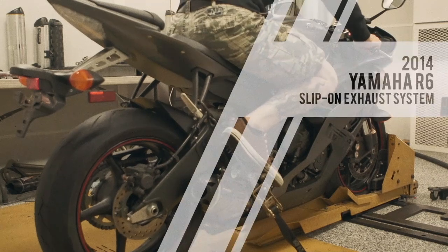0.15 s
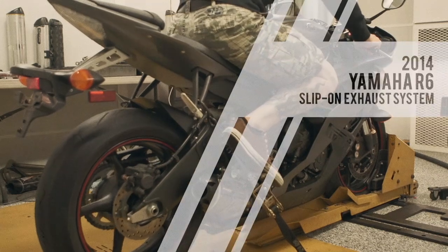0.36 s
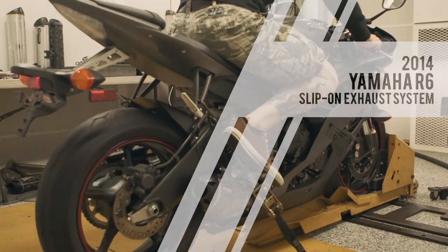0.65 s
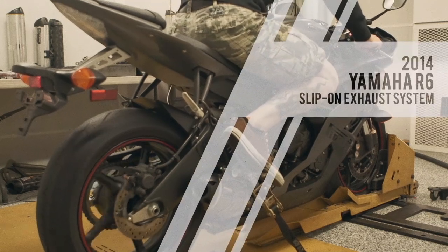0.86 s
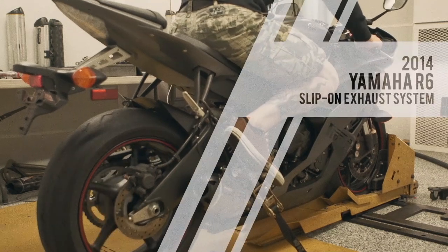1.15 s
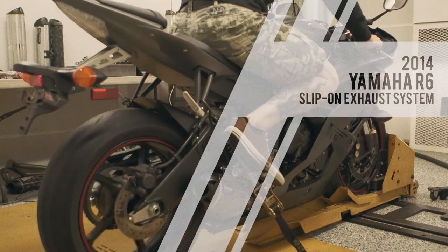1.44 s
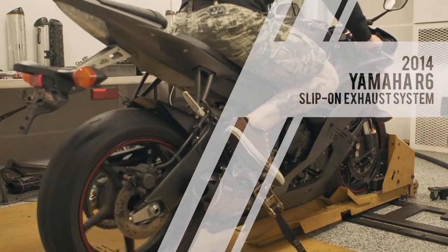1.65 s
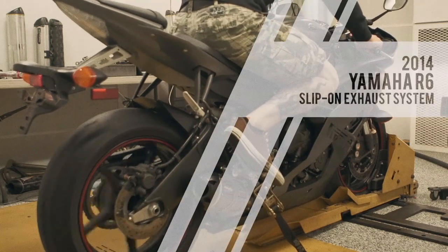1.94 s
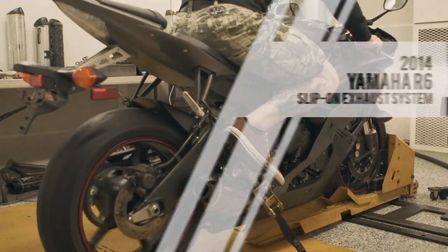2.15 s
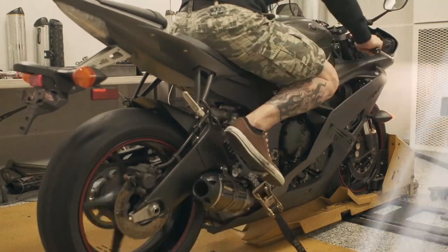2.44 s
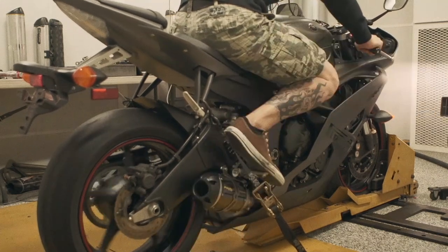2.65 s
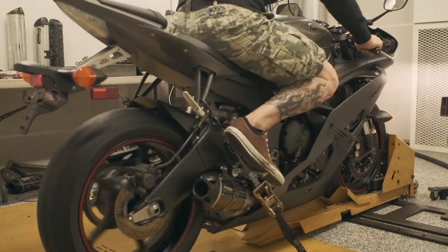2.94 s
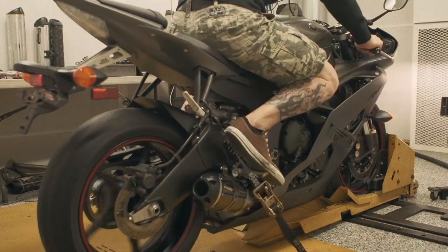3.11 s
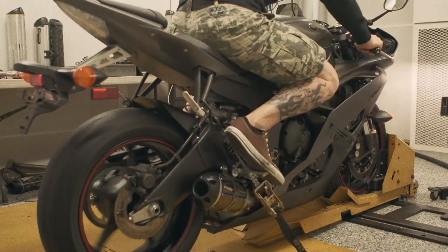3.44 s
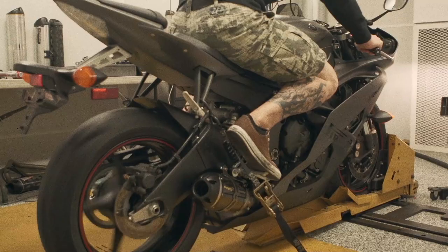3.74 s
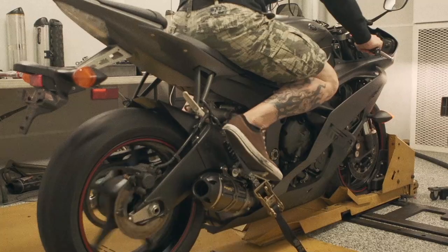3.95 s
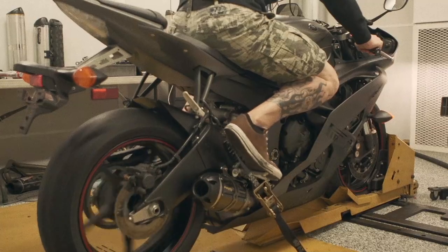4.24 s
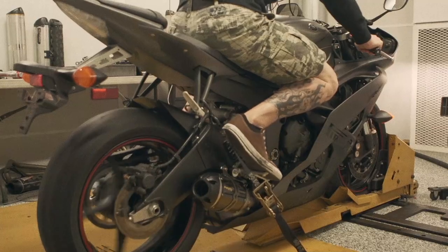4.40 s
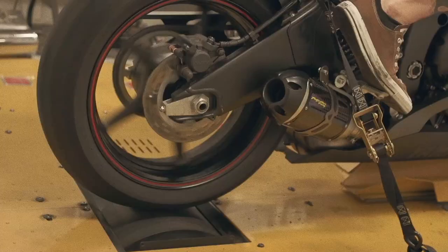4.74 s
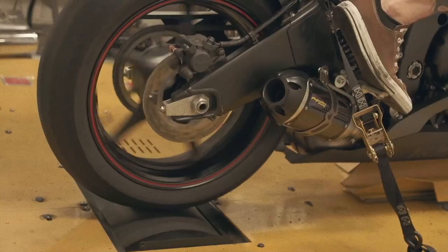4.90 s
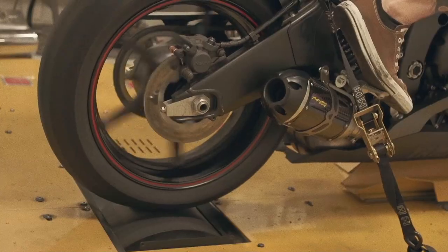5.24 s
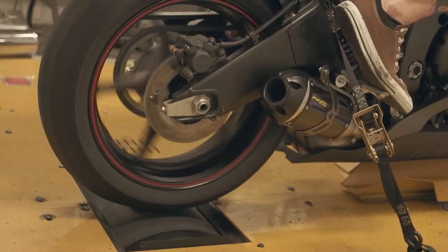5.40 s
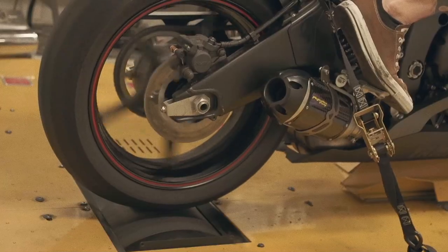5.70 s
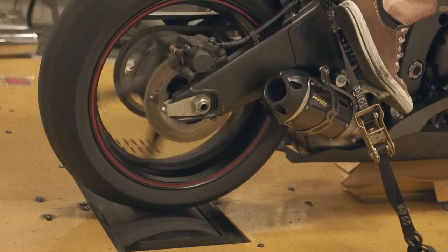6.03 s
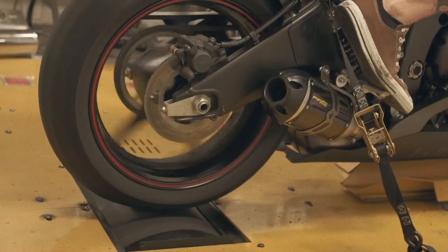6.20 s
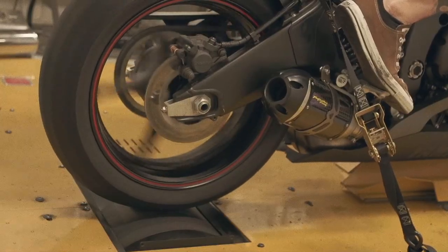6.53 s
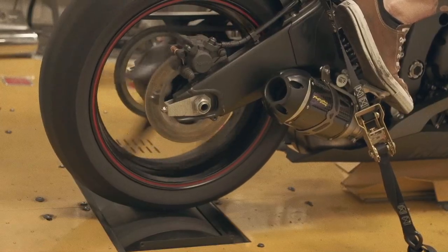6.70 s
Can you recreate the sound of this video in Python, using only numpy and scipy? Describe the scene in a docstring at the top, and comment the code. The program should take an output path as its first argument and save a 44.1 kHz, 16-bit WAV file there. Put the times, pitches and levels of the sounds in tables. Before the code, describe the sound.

A four-cylinder sport motorcycle on a roller dynamometer, heard close to the exhaust in a small reflective workshop, sitting right of centre and drifting slightly inward. From 0 to 0.8 s it idles with a deep, throbbing burble, stumbling briefly around 0.1 and 0.3 s. Revs rise quickly to a peak near 1.4 s, then sag with a full, loaded tone to a low, lumpy catch at about 2.7 s. From 2.8 s it digs in and climbs without a break until the cut at 6.9 s, roughly quadrupling its pitch from growl to hard raspy howl. Gas rush, valve clatter and hiss pulse with the firings; a panel buzzes near 3.7 s, short bright chain swishes flick past between 1 and 5.4 s, and gear whine swells around 5 s. Steady fan hum and low roller rumble lie underneath, while tyre fizz grows after 4 s.

```python
"""A four-cylinder sport motorcycle on a roller dynamometer in a small workshop, heard beside the exhaust.
It idles with brief stumbles, revs as the clutch is let in, sags, then pulls upward to the end.
Firing pulses are stacked orders of the firing rate, swept through fixed resonances of pipe and room.
Filtered noise makes the gas, clatter, hiss, tyre fizz, roller rumble and chain swishes; narrow noise bands
make panel buzz and gear whine. Cosines make the rasp and, with narrow noise bands, the fan hum."""
import sys
import numpy as np
from scipy import signal
from scipy.fft import rfft
from scipy.io import wavfile

SR = 44100
rng = np.random.default_rng(int(sys.argv[2]) if len(sys.argv) > 2 else 0)


def transcribe(signal):
    """Save signal, clipped to [-1, 1], as a 16-bit WAV file at the path in sys.argv[1]."""
    frames = np.atleast_2d(signal).T
    limited = np.clip(frames, -1, 1)
    pcm = np.round(limited * 32767).astype(np.int16)
    wavfile.write(sys.argv[1], SR, pcm)


N = 302526
TIME = np.arange(N) / SR  # seconds
MID_REVS_HZ = 100  # firings per second from which the speed laws count octaves

# Standing waves and cancellations between floor and walls, as peaks and dips.
# Each row: centre in Hz, width in Hz, height in dB at full strength.
ROOM = [(64.5, 13.4, -12), (91.6, 14.6, -9), (132.4, 4.8, -6), (155, 30, -4), (230.3, 21.4, -7),
        (267, 21.7, -11.5), (320.7, 12.7, -13.5), (333, 71, 5.5), (439, 41, -9), (484, 110, 4),
        (716, 18, 6.5), (1020, 30, 6.5), (1374, 84, 3.5)]


def amp(db):
    """Decibels to gain."""
    return 10 ** (np.asarray(db) / 20)


def evened(x):
    """Scales to an rms of one."""
    return x / np.sqrt(np.mean(x ** 2) + 1e-20)


def band_evened(x, lo_hz, hi_hz):
    """Scales so that one band has an rms of one."""
    hz = np.fft.rfftfreq(N, 1 / SR)
    in_band = (hz > lo_hz) & (hz < hi_hz)
    return x * N / np.sqrt(2 * np.sum(abs(rfft(x)[in_band]) ** 2))


def curves(rows):
    """Each column of a time table, joined by straight lines at every sample."""
    s, *columns = np.transpose(rows)
    return [np.interp(TIME, s, column) for column in columns]


def bell(x, centre, width):
    """A smooth hump of height one; the width spans its points at 1/e."""
    return np.exp(-(2 * (x - centre) / width) ** 2)


def swells(rows):
    """Gain of short events that rise and fall smoothly."""
    return sum(amp(db) * bell(TIME, s, length) for s, length, db in rows)


def octaves(rate):
    """Engine speed in octaves above mid revs."""
    return np.log2(rate / MID_REVS_HZ)


def colour(x, points, bells=()):
    """Causal minimum-phase filter from a broad spectrum plus narrow peaks and dips."""
    size = 32768
    hz = abs(np.fft.fftfreq(size, 1 / SR))
    point_hz, point_db = np.transpose(points)
    db = np.interp(np.log(hz + 1), np.log(point_hz + 1), point_db)
    for centre_hz, width, height_db in bells:
        db = db + height_db / (1 + (2 * (hz - centre_hz) / width) ** 2)
    # the Hilbert transform of the log spectrum supplies the phase
    spectrum = np.exp(np.conj(signal.hilbert(np.log(amp(db)))))
    response = np.fft.ifft(spectrum).real
    return signal.oaconvolve(x, response[:size // 2])[:N]


def fuzzy_tone(turns, width):
    """A narrow band of noise that follows a running phase, with a nominal width in Hz."""
    r = np.exp(-np.pi * abs(width) / SR)
    noise = rng.standard_normal(N) + 1j * rng.standard_normal(N)
    drift = signal.lfilter([1], [1, -2 * r, r * r], noise)
    return evened((drift * np.exp(2j * np.pi * turns)).real)


def per_firing(turns):
    """One random value for each whole turn of the phase, joined by straight lines."""
    values = rng.standard_normal(size=2048)
    return np.interp(turns, np.arange(len(values)), values)


def puffs(turns, steady, decay, scatter_db):
    """Steady noise plus noise that flares at each firing and decays, in firing periods, until the next."""
    strength = amp(scatter_db * per_firing(np.floor(turns)))
    flare = np.exp(-(turns % 1) / decay) * strength
    return (steady + flare) * rng.standard_normal(N)


def exhaust(turns, rate, load_db):
    """Firing pulses as a stack of orders; unequal cylinders add the half orders."""
    # The orders of the exhaust pulse, before tilt, imbalance and pipe.
    # Each row: multiple of the firing rate, level in dB.
    orders = [(1, 0.33), (1.5, -12.5), (2, -4.5), (2.5, -17), (3, -7.5), (3.5, -18), (4, -11.5), (5, -13.5),
              (6, -18), (7, -19.5), (8, -21), (10, -15.5), (11, -19)]
    # Cylinder imbalance, which varies with the revs.
    # Each row: firings per second, dB on order 1.5, dB on the higher half orders.
    imbalance = [(48.3, -10, -11), (68, -20, -3), (92, -18.5, 0), (108.5, -6.5, -5), (143, 5.5, 7.5),
                 (188, 2.5, -4)]
    # The silencer's broad response. Each row: frequency in Hz, gain in dB.
    pipe = [(25, -62), (40, -54.5), (70, -33.5), (100, -31), (150, -12.5), (200, -20), (300, -24.5),
            (400, -31.5), (600, -44.5), (1300, -56.5), (2500, -37), (5000, -43)]
    # dB per octave of order, pivoting on order 2: at mid revs, and its change per octave of revs
    tilt_mid_db, tilt_per_octave_db = -1.5, 0.7
    # scatter between firings at mid revs (0-1), and its factor per octave of revs
    scatter_mid, scatter_factor = 0.041, 0.97

    rates, *half_columns = np.transpose(imbalance)
    lope_db, half_db = (np.interp(rate, rates, column) for column in half_columns)
    tilt_db = tilt_mid_db + tilt_per_octave_db * octaves(rate)
    scatter = scatter_mid * scatter_factor ** octaves(rate)
    shaken = turns + 0.12 * scatter * per_firing(turns)  # early and late firings blur the high orders
    pulses = np.zeros(N)
    for multiple, db in orders:
        k = round(2 * multiple) / 2  # the crankshaft turns once in two firings
        imbalance_db = (lope_db if k < 2 else half_db) * (k % 1 > 0)
        order_db = db + tilt_db * np.log2(k / 2) + imbalance_db
        pulses += amp(order_db) * np.cos(2 * np.pi * k * shaken)
    pulses *= amp(load_db) * (1 + scatter * per_firing(turns))  # burns vary in strength
    return colour(pulses, pipe, ROOM)


def rasp(turns, rate):
    """A ladder of orders and half orders grows with the revs and climbs through the shell resonances."""
    # The raspy orders' broad spectrum. Each row: frequency in Hz, gain in dB.
    rasp_spectrum = [(300, -12), (480, 0), (690, -1), (800, -5), (1100, -7), (1600, -13), (2400, -16)]
    # Resonances of the silencer's shell. Each row: centre in Hz, width in Hz, height in dB.
    shell = [(490, 45, 7), (672, 65, 9.5), (1080, 90, 6), (1240, 60, 6)]
    mid_db, per_octave_db = -61.5, 13.5  # gain at mid revs, growth per octave of revs

    ladder = np.zeros(N)
    for k in range(6, 25):  # in half multiples of the firing rate
        waver = amp(2.8 * per_firing(turns / 14))  # a new random level every 14 firings
        strength = 0.5 ** (k % 2)  # half orders are half as strong
        ladder += strength * waver * np.cos(np.pi * k * turns + rng.uniform(0, 2 * np.pi))
    return amp(mid_db + per_octave_db * octaves(rate)) * colour(ladder, rasp_spectrum, shell)


def gas(turns, rate, load_db):
    """Turbulent puffs leave the pipe as a rush and a low burble; both grow with the throttle."""
    # The rush of gas, whose level is set later. Each row: frequency in Hz, relative dB per Hz.
    rush_spectrum = [(20, -47), (50, -31), (80, -13.5), (150, 12.5), (300, 8.5), (420, 2), (550, 4.5),
                     (700, -0.5), (1000, -1.5), (1500, -6), (2300, -9), (3200, -20.5), (6000, -34),
                     (16000, -44)]
    # The burble of uneven gas flow. Each row: frequency in Hz, relative dB per Hz.
    burble_spectrum = [(30, -26), (70, -3.5), (120, -9.0), (200, 3.5), (300, 4.5), (370, 1.5),
                       (450, -14.5), (900, -39.0)]
    # base level in dB, dB per dB of load, dB per octave of revs
    rush_mid_db, rush_per_load, rush_per_octave = -47.5, 0.91, -0.47
    burble_mid_db, burble_per_load, burble_per_octave = -46.5, 1.36, -5  # favours low revs

    softened_room = np.array(ROOM) * [1, 1, 0.6]
    rush = colour(puffs(turns, steady=3.1, decay=1.0, scatter_db=2), rush_spectrum, softened_room)
    burble = colour(puffs(turns, steady=0.8, decay=0.57, scatter_db=3.0), burble_spectrum)
    rush_db = rush_mid_db + rush_per_load * load_db + rush_per_octave * octaves(rate)
    burble_db = burble_mid_db + burble_per_load * load_db + burble_per_octave * octaves(rate)
    return amp(rush_db) * band_evened(rush, 642, 2740) + amp(burble_db) * evened(burble)


def machinery(turns, clatter_db, fizz_db):
    """Valve clatter and chain hiss pulse with the firings, over buzzing panels and tyre fizz on the roller."""
    # Spectra of valve clatter, chain hiss and tyre fizz, whose levels are set later.
    # Each row: frequency in Hz, relative dB per Hz.
    clatter_spectrum = [(300, 2.5), (1500, 0.5), (2600, 2.5), (3500, 0.5), (5000, -1.5), (7000, -4.5),
                        (10000, -15.5), (16000, -49)]
    hiss_spectrum = [(1000, -64), (5000, -9), (8000, -2.5), (10500, -2), (12000, -7), (14000, -16),
                     (16000, -22)]
    fizz_spectrum = [(3000, -40), (9500, -16), (12000, 0), (14300, 1), (16000, -4)]
    # Thin metal parts that the engine sets buzzing.
    # Each row: centre in Hz, nominal width in Hz, relative level in dB.
    panels = [(4480, 170, 0), (6520, 260, -11)]
    # Flares of the panel buzz. Each row: peak time in seconds, length in seconds, gain in dB.
    buzz_flares = [(1.0, 0.35, -67), (3.66, 0.31, -56)]
    hiss_offset_db, buzz_offset_db = -8.5, -16.5  # relative to the clatter

    clatter = colour(puffs(turns, steady=4.3, decay=0.11, scatter_db=7.5), clatter_spectrum)
    hiss = colour(puffs(turns, steady=2.8, decay=0.097, scatter_db=5), hiss_spectrum)
    fizz = colour(rng.standard_normal(N), fizz_spectrum)
    buzz = sum(amp(db) * fuzzy_tone(hz * TIME, width) for hz, width, db in panels)
    buzz_gain = amp(clatter_db + buzz_offset_db) + swells(buzz_flares)
    return (amp(clatter_db) * band_evened(clatter, 3240, 6300)
            + amp(clatter_db + hiss_offset_db) * band_evened(hiss, 7500, 11700)
            + amp(fizz_db) * band_evened(fizz, 11500, 17000)
            + buzz_gain * buzz)


def dynamometer(load_db):
    """Cooling fans hum with a slight waver; the roller rumbles more under load."""
    # Blade tones of the cooling fans, before the swell. Each row: frequency in Hz, level in dB.
    fans = [(349.9, -44), (495.3, -56), (577.8, -54.5), (742.9, -60), (825.5, -60.5), (1073, -61.5)]
    # Slow swell of all fan tones. Each row: time in seconds, gain in dB.
    fan_swell = [(0, -3.5), (1.0, 0.5), (2.0, 2.5), (4.0, 1.5), (6.86, 1)]
    rumble_base_db, rumble_per_load = -50, 0.5  # dB, dB per dB of load

    hum = np.zeros(N)
    for hz, db in fans:
        tone = np.cos(2 * np.pi * hz * TIME) + 0.77 * fuzzy_tone(hz * TIME, 6.7)
        hum += amp(db) * evened(tone)
    rumble = colour(rng.standard_normal(N),
                    [(15, -20), (52, -30), (76, -1.5), (100, 0), (160, -33), (400, -40.5)])
    rumble_gain = amp(rumble_base_db + rumble_per_load * load_db)
    return amp(curves(fan_swell)[0]) * hum + rumble_gain * evened(rumble)


def drivetrain(turns, rate):
    """Tooth meshing whines along with the revs; now and then the chain swishes."""
    # Meshing teeth of chain and gears.
    # Each row: multiple of the firing rate, nominal width in Hz, relative level in dB.
    mesh = [(8.65, 12, 6), (11.5, 14, 0), (41.2, 190, 0), (82.2, 320, -9)]
    # Bright swishes of the chain. Each row: peak time in seconds, length in seconds, level in dB.
    swishes = [(1.05, .14, -67), (1.69, 0.052, -58), (2.19, .13, -56), (2.715, .04, -61),
               (2.85, .13, -63.5), (3.21, .05, -62.5), (3.92, 0.079, -59), (4.33, .08, -58),
               (5.39, .1, -63)]
    peak_db, floor_db = -60.5, -80  # whine gain: hump added to a constant floor
    peak_rate, peak_width = 124, 40  # firings per second

    whine = sum(amp(db) * fuzzy_tone(multiple * turns, width) for multiple, width, db in mesh)
    whine_gain = amp(floor_db) + amp(peak_db) * bell(rate, peak_rate, peak_width)
    swish = colour(rng.standard_normal(N),
                   [(3000, -37), (8000, -3), (10700, 0), (12500, -8), (16000, -13)])
    return whine_gain * whine + swells(swishes) * evened(swish)


def scene():
    """All engine parts follow one running phase and one throttle; everything sits right of centre."""
    # Engine speed before the stumbles drag it. Each row: time in seconds, firings per second.
    firing = [(0, 47.6), (0.76, 47.3), (0.99, 59.5), (1.11, 70.8), (1.2, 78.8), (1.41, 85.4), (1.59, 79.2),
              (1.77, 74.8), (1.89, 70), (2.2, 64), (2.62, 48.7), (2.76, 39.5), (2.9, 47.3), (3.09, 51.7),
              (3.46, 67.3), (3.8, 80.3), (4.09, 91), (4.74, 112.3), (5.6, 144.7), (6.55, 178.6),
              (6.86, 190.4)]
    # Throttle, as strength of the exhaust pulses. Each row: time in seconds, gain in dB.
    load = [(0, -4.5), (0.75, -1.5), (1.2, 0.1), (2.3, 0.9), (2.8, 1), (2.94, 3), (3.3, 2.5), (3.8, 2.5),
            (4.12, 3.5), (4.55, 2.5), (5.0, 3), (5.55, 0.5), (6.86, 2.6)]
    # Mechanical noise, mostly growing as the wheel gathers speed.
    # Each row: time in seconds, clatter level in dB, tyre fizz level in dB.
    machine = [(0, -61.5, -78), (0.3, -59.5, -76), (1.1, -57.5, -76), (1.5, -56.5, -71), (2.8, -54.5, -75),
               (3.7, -53.5, -71), (4.35, -55.5, -63), (5.4, -52, -61.5), (5.8, -52.5, -63.5),
               (6.86, -49.5, -60)]
    # The engine stumbles at low revs and a few burns come out weak.
    # Each row: centre in seconds, length in seconds, depth in dB.
    stumbles = [(0.108, 0.1096, -5.5), (0.31, 0.084, -7), (2.715, 0.0403, -6)]
    # Stereo balance. Each row: time in seconds, left minus right in dB.
    pan = [(0.0, -8.5), (1.87, -5.0), (2.56, -7.5), (3.1, -7.5), (3.76, -4.5), (4.03, -5), (5.35, -5.5),
           (5.62, -2.5), (6.86, -2.5)]
    sag_per_db = 0.55  # firings per second that a stumble costs for each dB of its depth

    (rate,), (load_db,), (clatter_db, fizz_db) = curves(firing), curves(load), curves(machine)
    stumble_db = sum(db * bell(TIME, s, length) for s, length, db in stumbles)
    rate = rate + sag_per_db * stumble_db
    turns = np.cumsum(rate) / SR  # running phase, one unit per firing
    mix = (exhaust(turns, rate, load_db + stumble_db)
           + rasp(turns, rate)
           + gas(turns, rate, load_db)
           + machinery(turns, clatter_db, fizz_db)
           + dynamometer(load_db)
           + drivetrain(turns, rate))
    lean = amp(curves(pan)[0])
    return mix * np.array([lean, np.ones(N)]) * 2 / (1 + lean)  # the two gains average one


def record(dry):
    """A steep linear-phase low-pass takes off the extreme treble."""
    edge_hz = 15750
    lowpass = signal.firwin(511, edge_hz, window=("kaiser", 9), fs=SR)
    return signal.oaconvolve(dry, lowpass[None], "same")


dry = scene()
out = record(dry)
transcribe(out)
```